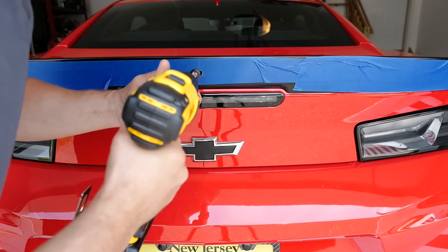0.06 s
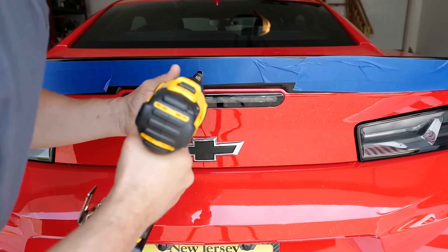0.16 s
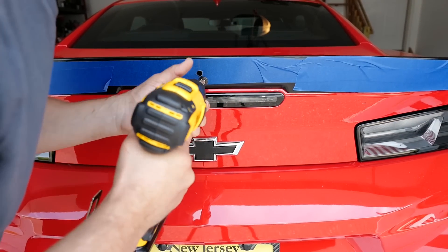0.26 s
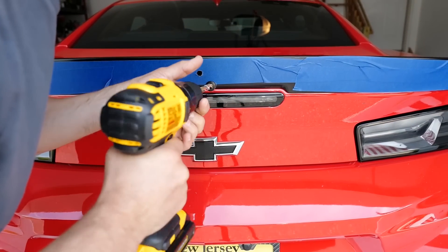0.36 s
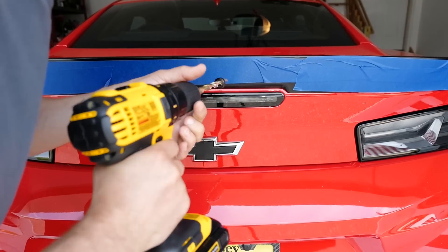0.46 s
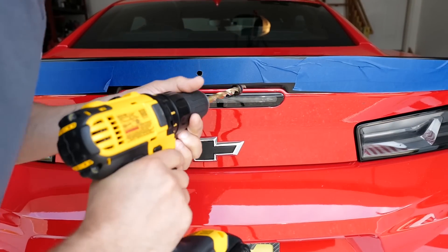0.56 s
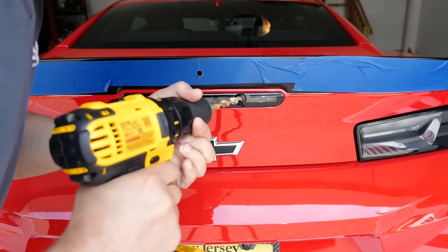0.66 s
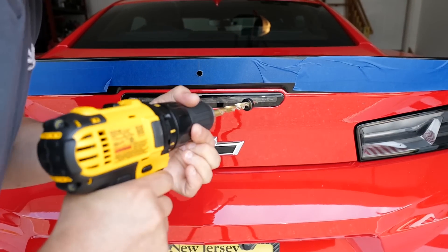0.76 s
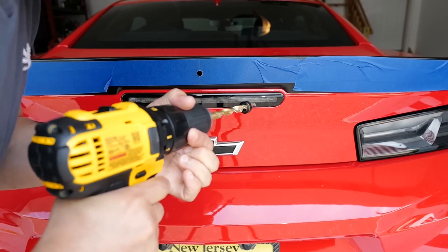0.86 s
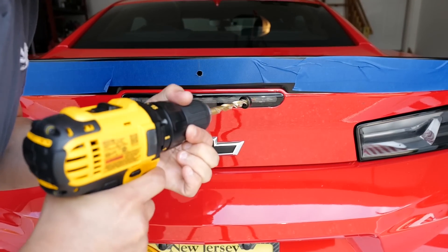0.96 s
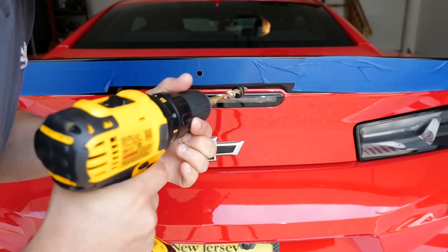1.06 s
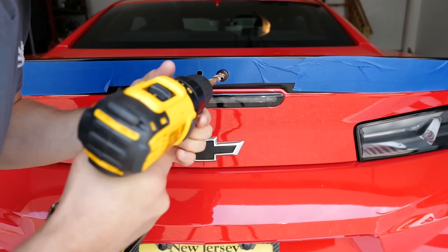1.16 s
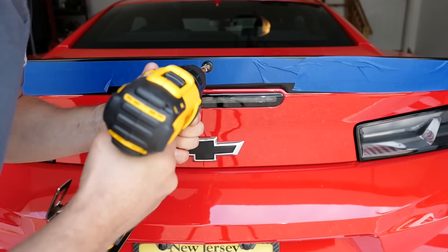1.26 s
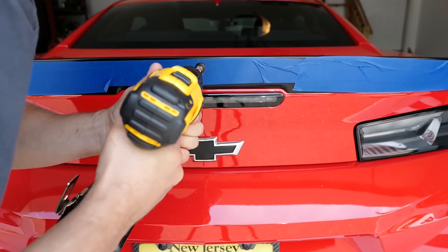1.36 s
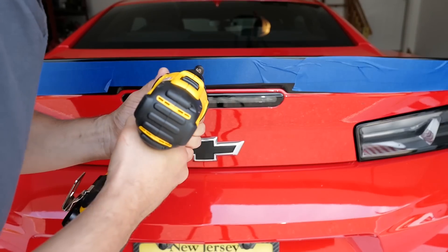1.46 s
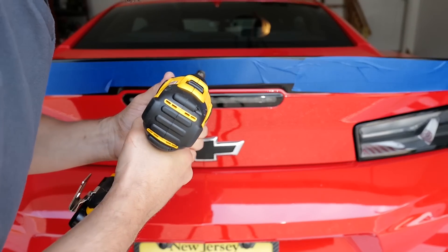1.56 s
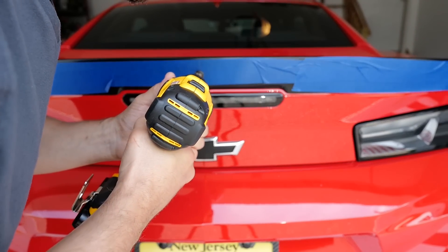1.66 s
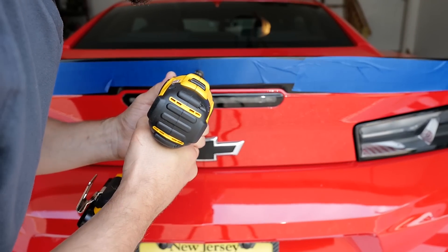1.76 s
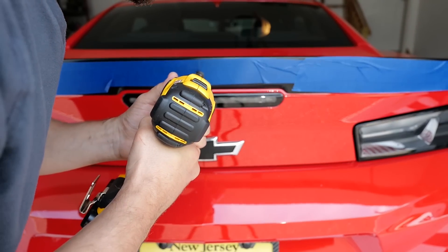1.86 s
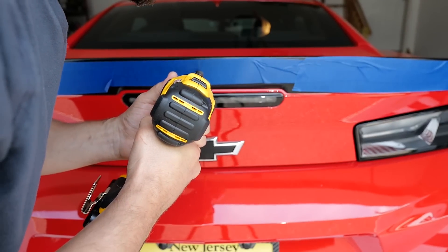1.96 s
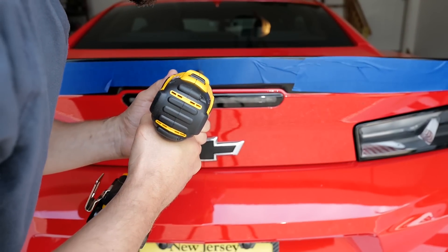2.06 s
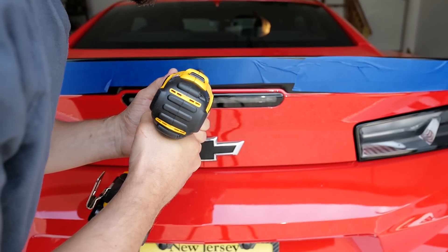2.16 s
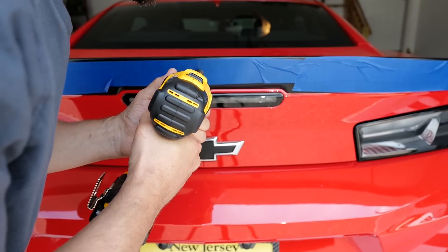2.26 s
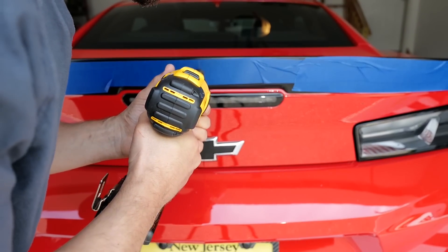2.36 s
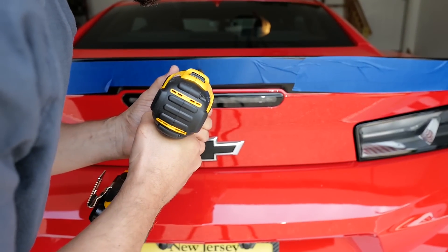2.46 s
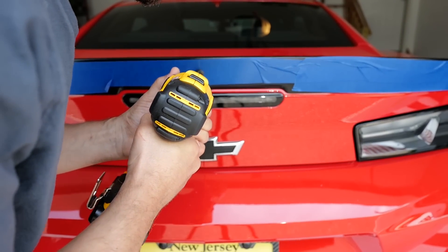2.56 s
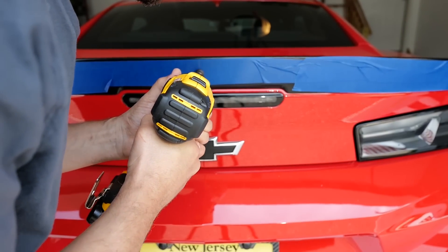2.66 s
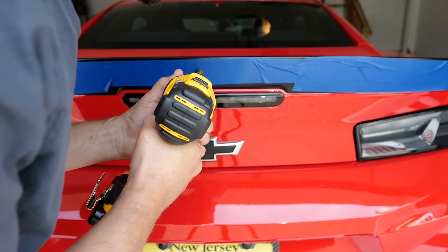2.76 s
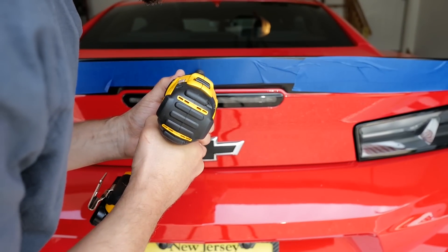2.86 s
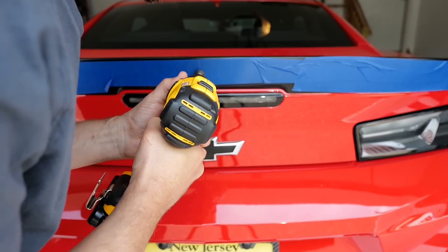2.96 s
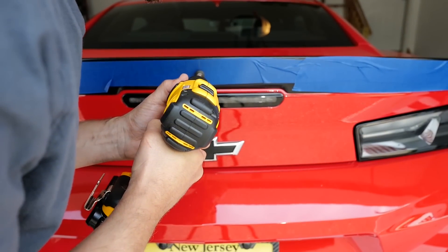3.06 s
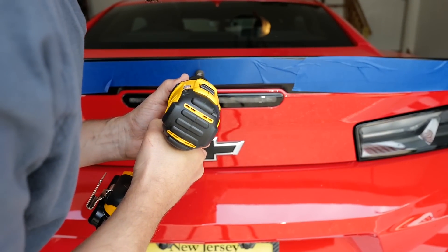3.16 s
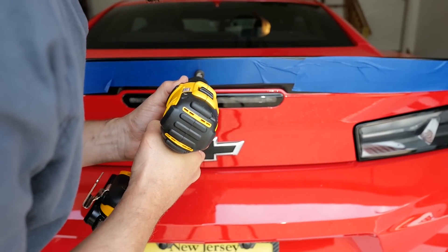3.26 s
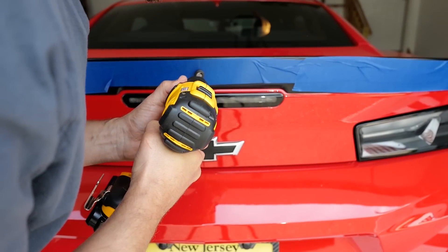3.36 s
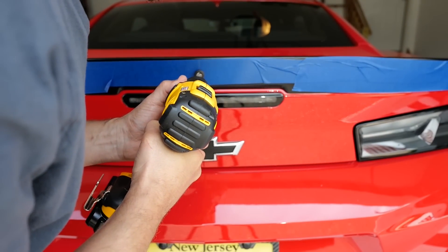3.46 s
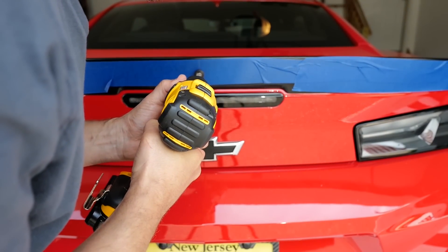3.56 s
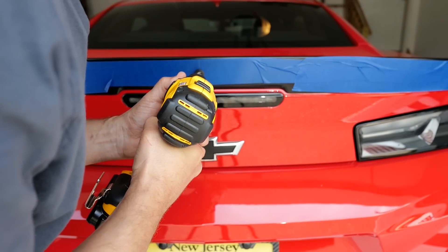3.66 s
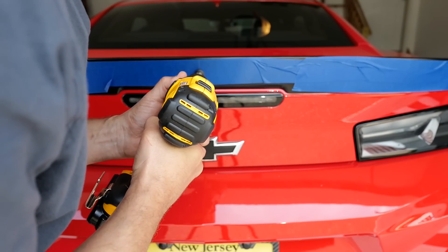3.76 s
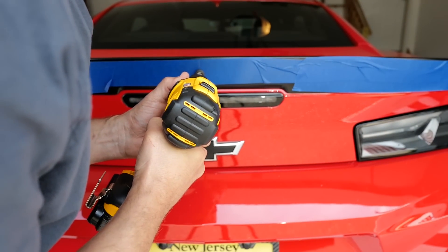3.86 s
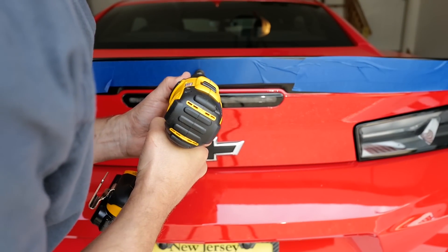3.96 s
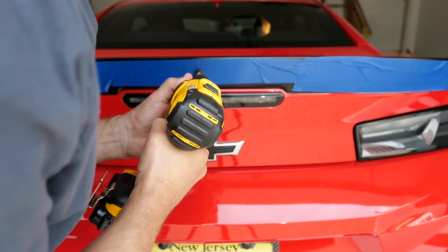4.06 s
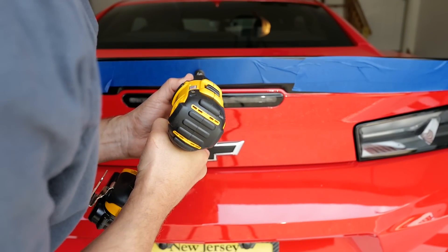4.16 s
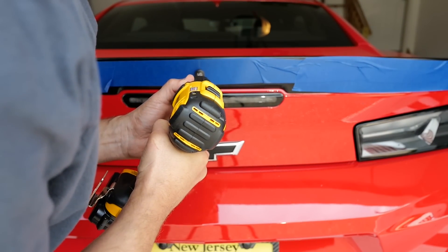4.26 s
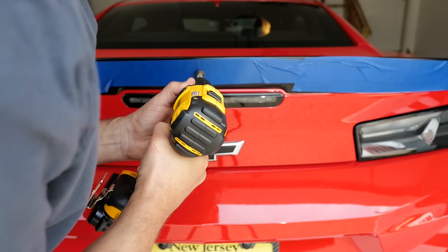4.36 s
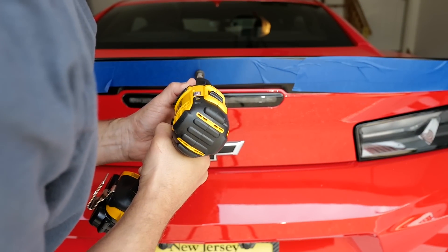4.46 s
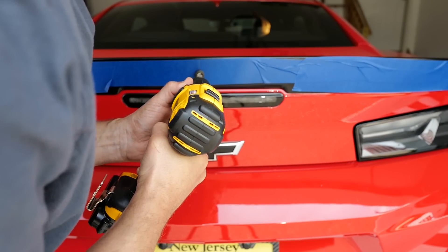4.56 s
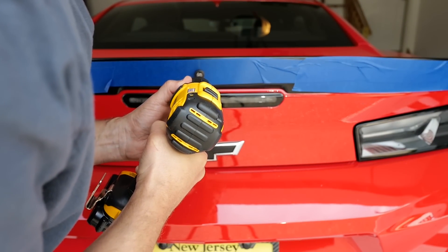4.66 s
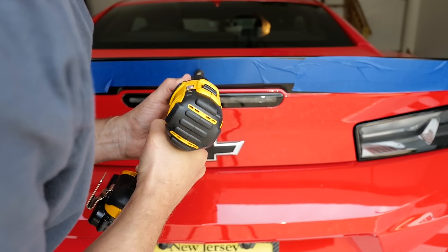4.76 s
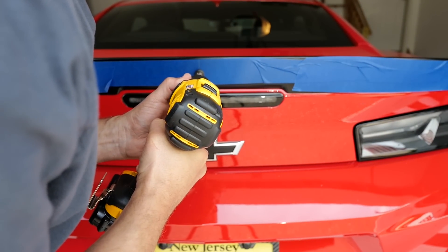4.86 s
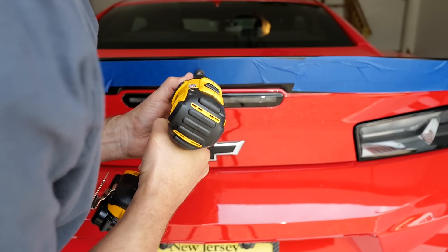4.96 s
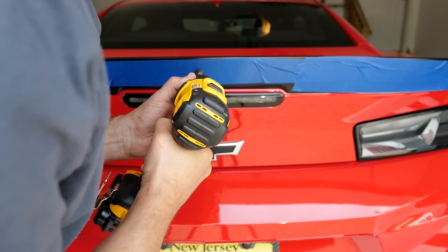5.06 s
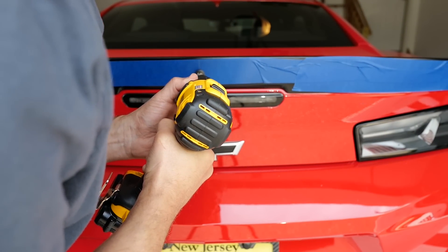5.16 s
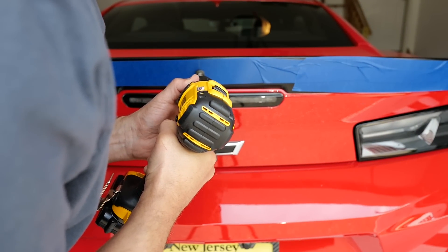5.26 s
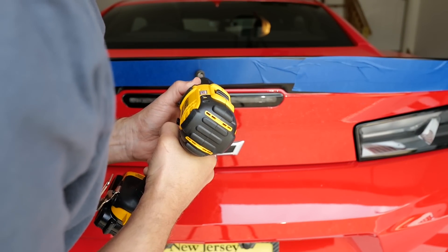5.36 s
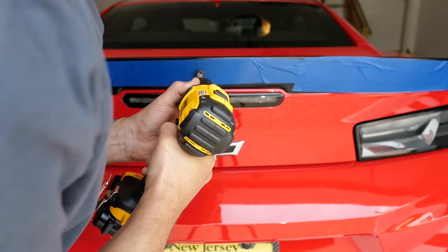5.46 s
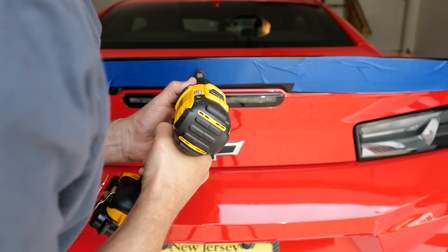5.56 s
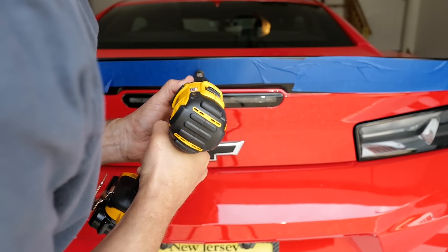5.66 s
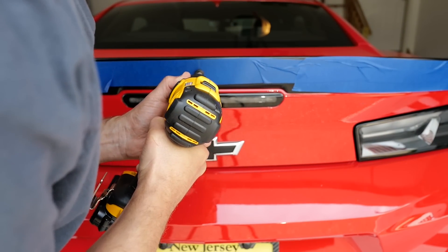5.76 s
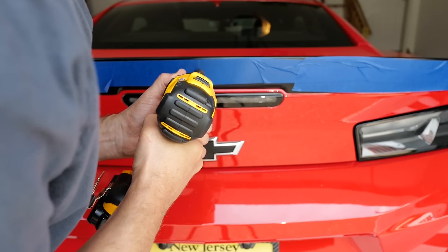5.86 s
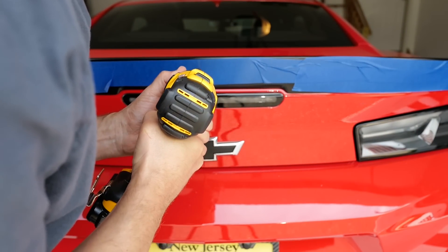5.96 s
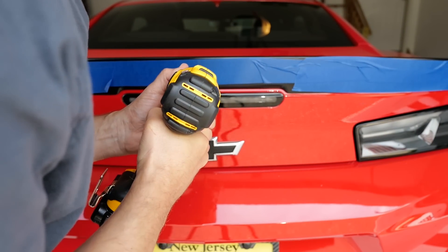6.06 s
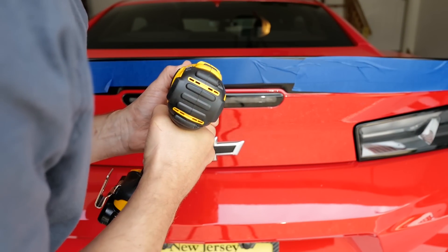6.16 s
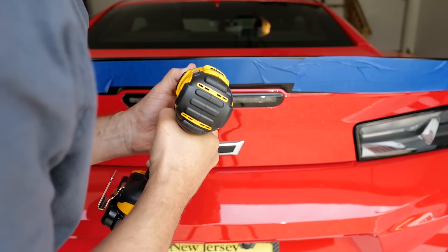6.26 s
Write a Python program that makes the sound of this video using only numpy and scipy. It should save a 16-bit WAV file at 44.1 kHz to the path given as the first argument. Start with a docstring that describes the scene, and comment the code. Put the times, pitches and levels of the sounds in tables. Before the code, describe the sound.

A quiet garage with low rumble and faint hum, picked up close in stereo with a short room tail. A faint high cricket chirps around 0.15-0.3 s. From 0 to 1.4 s hands adjust a drill chuck: light ticks, skin and cloth rubs, a sharp metallic clack at 0.77, a cluster of clicks near 0.95 and rough scraping around 1.0-1.2. Things grow calmer until about 2.0, when the bit taps and scrapes the car's sheet metal with duller knocks. At 2.3 the trigger clicks, a brief thin whistle sings, and the motor races up within about 0.3 s to a loud bright whine with gear rattle and airy fan hiss. Pitch sags gradually from 3.5, recovers quickly at 4.1, sinks deeper from 4.55, then surges back around 5.2-5.4, with rough bit chatter. It holds near full speed, still running at the end near 6.4.

```python
"""First come the clicks and scrapes of hands tightening a drill chuck, in a humming garage where a cricket chirps.
The bit then knocks and scrapes on a car's sheet metal: short rough pushes and grit ring steel or panel.
A click, a whistle from the speed control, and the motor runs up: fan, rotor and gears whine on multiples of the
shaft speed, over gear rattle and air hiss. The pitch sags twice, first as the trigger is eased, then as the bit
bites. The motor still runs at the end; a short room tail surrounds drill and hands."""
import sys
import numpy as np
from scipy import signal
from scipy.fft import rfft, irfft
from scipy.io import wavfile
from scipy.ndimage import uniform_filter1d

SR = 44100
rng = np.random.default_rng(int(sys.argv[2]) if len(sys.argv) > 2 else 0)


def generate_wav(sig):
    """Save sig (samples, or channels by samples) to the path in sys.argv[1] as 16-bit PCM at SR."""
    pcm = np.round(np.clip(np.atleast_2d(sig).T, -1, 1) * 32767).astype(np.int16)
    wavfile.write(sys.argv[1], SR, pcm)


N = 278271
T = np.arange(N) / SR  # time, s

# Colour of the garage rumble: f/Hz, relative level/dB per Hz
GARAGE_COLOUR = [(13, -64), (22, -34), (43, -31), (108, -8.5), (138, -8), (198, -6.5), (306, -8.5),
                 (502, -14.5), (758, -14.5), (2090, -25.5), (2400, -27.5), (3330, -29), (3820, -31),
                 (4150, -32), (15500, -37)]
# Steady garage hums: f/Hz, width/Hz, level/dB
GARAGE_HUMS = [(112, 24, -70), (168, 14, -65), (199.4, 10.7, -61.5), (227, 12.6, -63)]
RUMBLE_DB = -59

# Cricket pulses: start t/s, level/dB
CRICKET_CHIRPS = [(.13, -61), (.18, -63), (.215, -67), (.25, -68)]
CRICKET_HZ, CHIRP_S = 3910, 0.024

# Ringing of the chuck: f/Hz, relative level/dB, time to fall 60 dB/s
CHUCK_MODES = [(936, 0.5, 0.032), (1404, 7.5, 0.0086), (1860, 2, 0.015), (2230, 12, 0.0034),
               (3050, -15, .015)]
# Ringing of the steel jaws: f/Hz, relative level/dB, time to fall 60 dB/s
JAW_MODES = [(3520, -4, 0.0038), (4050, 0, 0.0042), (4600, -5, 0.006), (5650, -11, 0.013),
             (7160, -8, 0.002)]
# Ringing of the car panel: f/Hz, relative level/dB, time to fall 60 dB/s
PANEL_MODES = [(733, -0.5, 0.083), (996, 11, 0.016), (1400, -3, 0.012), (1920, 4, 0.018), (2550, -17, .012)]
# Rubs of hand and tool: loudest t/s, swell/s, fade/s, scrape level/dB, steel jaws level/dB,
# skin and cloth hiss level/dB
HAND_RUBS = [(0.0, .02, 0.37, -81, -60.5, -81), (.39, .15, .12, -73, -76, -66),
             (.61, 0.11, 0.076, -59, -64, -51.5), (.77, 0.025, 0.05, -55, -46.5, -54),
             (1.02, .13, .12, -42, -49, -64), (1.08, .1, 0.021, -47, -49.5, -71),
             (1.155, 0.04, 0.061, -50.5, -58, -50.5), (1.3, .3, 0.56, -55, -65, -69),
             (2.03, .05, 0.39, -58, -84, -73), (2.141, 0.038, 0.047, -45, -75, -64),
             (2.22, 0.23, .08, -54.5, -80, -69)]
# Hands merely holding the tool: scrape level/dB, steel level/dB, hiss level/dB
HOLDING_DB = (-77, -100, -79.5)
RUB_SPAN_DB = 20  # level change over one swell or fade time
TIP_ON_PANEL_S = 1.97  # from here the scrape rings the panel
# Single contacts: t/s, body peak level/dB, treble crack peak level/dB, contact/ms, share on the panel (0-1)
CONTACTS = [(0.036, -39.5, -41, 0.57, 0.4), (0.146, -50, -70, 4.2, 0.9), (.537, -44, -49, 2.3, 0),
            (.634, -50, -66, 5, 0.9), (.675, -44, -57, 2.5, 0.1), (.712, -52, -43, 1.2, 0),
            (.722, -36, -37, 5, 0), (0.7693, -20, -31, 0.68, 0.23), (.92, -51, -40, .5, 0.1),
            (.952, -31, -42, .6, 0), (.966, -36, -37, 0.26, 0), (.978, -48, -39, .4, 0),
            (.997, -41, -43, .6, 0), (1.123, -41, -36, 0.65, 0.2), (1.141, -31.5, -28.5, 6.8, 0),
            (1.202, -49, -38, 2.8, 0.1), (1.39, -38, -49, 2.1, 0.14), (2.003, -35.5, -64, .8, 1),
            (2.124, -45, -60, 2.3, 0.7), (2.226, -44, -66, 1.1, 1), (2.298, -50, -39, 2, 0)]

# Speed control whistle: t/s, level/dB
WHISTLE_LEVEL = [(2.298, -43), (2.33, -38), (2.36, -39.5), (2.39, -32), (2.43, -34)]
WHISTLE_HZ = 3932  # switching rate
WHISTLE_MULTIPLE_DB = [-4, 2, -10, -10]  # relative starting levels of multiples 1 to 4
WHISTLE_DULL_DB_PER_S = 120  # each higher multiple fades this much faster
WHISTLE_WAVER_DB = 1.5

# Shaft speed glides as trigger or load changes: start t/s, speed it heads for f/Hz, time constant/s
SHAFT_GLIDES = [(2.306, 410.3, 0.073), (3.284, 407.4, 0.003), (3.467, 302.7, 0.224), (4.125, 405.7, 0.074),
                (4.546, 267.4, 0.289), (5.181, 288.4, 0.071), (5.261, 405.8, 0.086), (6.175, 403.7, 0.138)]
MAX_CLIMB_HZ_PER_S = 1800
FULL_HZ = 415  # shaft speed at which full-speed levels hold
GEAR_RATIO, BITE_S = 17.4, 5.065  # shaft turns per chuck turn; a moment when the cutting lip bites

# Main tones, in shaft multiples: unbalance, its octave, rotor slots, fan blades, blade octave
MAIN_MULTIPLES = (1, 2, 10, 19, 38)
FAN_MULTIPLE = MAIN_MULTIPLES[3]
# One row for each main tone: full-speed level before the housing/dB, tilt/dB per octave of speed,
# rise under strain/dB, waver/dB
MAIN_TONES = [(-42.5, -1.5, -4, 1.5), (-44, 4.5, 3, 1.5), (-30.5, 2.5, 3, 1.8), (-27, 7.5, 6.5, 1.25),
              (-41.5, 0, 1, 4.5)]
# What the housing lets out of a main tone: f/Hz, gain/dB
HOUSING_GAIN = [(150, -21), (250, -28), (285, -1.5), (320, -4.5), (350, -5.5), (390, 1.5), (420, -0.3),
                (515, -11), (570, -3), (700, -2), (760, -0.5), (830, -14.5), (1500, -8), (2000, 5),
                (2600, 10.5), (2760, -12), (3300, -18), (3430, -5), (3800, 3), (4100, -1), (4900, -2),
                (5400, 5), (6000, -2), (6250, -4), (6550, -2.5), (6850, -9), (7200, 3.5), (7800, 3.5),
                (8300, 0.1), (10800, -11), (11500, 0.1), (12200, -3), (12800, 0), (13600, 0), (14400, 2),
                (15200, 5.5), (15800, -4)]
# Tones that stand out near one pitch: chatter of the bit, octave of the rotor slots (shaft multiples)
PEAK_MULTIPLES = (7, 20)
# One row for each: best level/dB, best pitch f/Hz, loss/dB per octave off it, least level/dB,
# swing per chuck turn/dB, waver/dB
PEAK_TONES = [(-38.5, 1990, 70, -45, 3.4, 1.2), (-32.5, 6840, 70, -42, -1, 4)]
# Weaker tones, buried when the motor slows: shaft multiple, full-speed level/dB
WEAK_TONES = [(3.023, -46.5), (4, -46), (8.91, -46), (11.91, -44.5), (13.9, -47.5), (12.98, -47.5),
              (15.93, -43.5), (17.05, -44.5), (18.4, -49), (4.96, -53.5), (20.7, -53), (22.6, -45),
              (29.6, -42.5)]
WEAK_DB_PER_OCTAVE = 6
TONE_KNEE_HZ, TONE_DB_PER_OCTAVE = 204, 20  # all tones die away below this shaft speed

# Colour of the gear rattle: f/Hz, relative level/dB per Hz
RATTLE_COLOUR = [(30, -90), (150, -61), (250, -18), (318, -12.5), (529, -15.5), (615, -20), (747, -15),
                 (1260, -6), (2070, -3.5), (4130, -4.5), (5570, -4), (6870, -9), (9000, -7), (11700, -75),
                 (19800, -120)]
RATTLE_DB, RATTLE_SURGE_DB = -27.5, 3.5  # basic level; extra under full strain
RATTLE_KNEE_HZ, RATTLE_DB_PER_OCTAVE = 262, 7.5  # fades below this shaft speed
# Colour of the fan's air hiss: f/Hz, relative level/dB per Hz
AIR_COLOUR = [(1500, -30.5), (3000, -11), (4500, -14), (6700, -12.5), (7700, 0.5), (9000, 1.5),
              (11000, -1.5), (13000, -0.5), (16000, -6)]
AIR_DB_PER_OCTAVE, AIR_SURGE_DB = 12, 6.5
STRAIN_LAG_S = 0.034
BLADE_HISS_DB, BLADE_HISS_HZ = -38, 500  # full-speed level; reach either side of the fan tone
# Slow drifts: t/s, air hiss full-speed level/dB, bit chatter level/dB, fan tone change/dB
SLOW_DRIFT = [(2.36, -29, -52, 0), (2.45, -23.5, -45, -1.5), (2.57, -25, -42, 1), (2.75, -24.5, -41, -0.5),
              (3.47, -25.5, -48, 1.5), (3.9, -24, -42.5, -4), (4.36, -25, -37.5, 0), (4.6, -26, -46, -1.5),
              (4.9, -24.5, -55, -0.5), (5.07, -25.5, -39, 1.5), (5.43, -24.5, -36, -1.5),
              (5.65, -25.5, -39, -2), (5.9, -24, -38, -5), (6.1, -24, -43, -6), (6.25, -24, -42, 0.5)]

# Room sound from the sides: f/Hz, level under the centre/dB
ROOM_SIDE_COLOUR = [(100, -19), (300, -22), (520, -9), (1200, -18), (2400, -19), (4400, -16), (8000, -17),
                    (13000, -14)]
# Left-right balance of drill and hands: f/Hz, left minus right/dB
LEFT_MINUS_RIGHT = [(100, 3.5), (500, -1), (1200, 1), (2400, 0), (4400, 1), (8000, 2.5), (14000, -1.5)]
QUIET_LIFT_DB, LOUD_DB = 2.5, -17  # largest lift; level at which no lift is left
TOP_HZ = 15720


def undb(db):
    """Turn decibels into a plain multiplier."""
    return 10 ** (np.asarray(db) / 20)


def unit(x):
    """Scale to an average (RMS) level of one."""
    return x / np.sqrt(np.mean(x ** 2))


def noise():
    """White noise: every pitch equally strong."""
    return rng.standard_normal(N)


def colour(x, table, share=1):
    """Filter by (Hz, dB) points joined on a log-frequency axis; share scales the dB."""
    hz, db = np.transpose(table)
    f = np.arange(N // 2 + 1) * SR / N + 1  # 1 Hz added to avoid log of zero
    gain = undb(share * np.interp(np.log(f), np.log(hz), db))
    return irfft(rfft(x) * gain, N)


def band(x, lo_hz, hi_hz):
    """Keep mainly the sound between two frequencies."""
    return signal.sosfilt(signal.butter(2, [lo_hz, hi_hz], "bandpass", fs=SR, output="sos"), x)


def ring(x, modes):
    """Add up the decaying tones of a solid body driven by x."""
    out = 0
    for hz, db, t60 in modes:
        decay = np.exp(-np.log(1000) / (t60 * SR))
        angle = 2 * np.pi * hz / SR
        feedback = [1, -2 * decay * np.cos(angle), decay * decay]
        out = out + undb(db) * signal.lfilter([0, np.sin(angle)], feedback, x)
    return out


def walk(rate):
    """Smooth random wander: levels held for 1 / rate seconds, averaged twice."""
    hold = int(SR / rate)
    steps = np.repeat(rng.standard_normal(N // hold + 1), hold)
    smooth = uniform_filter1d(uniform_filter1d(steps, hold), hold)
    return unit(smooth[:N])


def grit(rate, scatter_db):
    """Tiny impacts of uneven size at random moments, about rate per second."""
    hits = rng.random(N) < rate / SR
    size = undb(scatter_db * np.minimum(rng.exponential(size=N), 4))
    return unit(hits * noise() * size)


def curves(table):
    """Join each column's points over time."""
    s, *columns = np.transpose(table)
    return [np.interp(T, s, c) for c in columns]


def garage():
    """Broad rumble with a few wavering hums, nearly the same at both microphone ports."""
    def field():
        """One layer of coloured noise plus narrow bands of noise."""
        hums = sum(undb(db) * unit(band(noise(), f - width / 2, f + width / 2))
                   for f, width, db in GARAGE_HUMS)
        return undb(RUMBLE_DB) * unit(colour(noise(), GARAGE_COLOUR)) + hums
    difference = undb(-12.5) * np.array([[1], [-1]]) * field()
    return field() + difference


def cricket():
    """Short smooth pulses of one pitch."""
    half = CHIRP_S / 2
    gate = sum(undb(db) * np.exp(-((T - s - half) / half) ** 4) for s, db in CRICKET_CHIRPS)
    return gate * np.sin(2 * np.pi * CRICKET_HZ * T)


def hands():
    """Stick-slip grit rings chuck, jaws or panel; palms and sleeves hiss."""
    power = undb(HOLDING_DB)[:, None] ** 2
    for s, swell, fade, *db in HAND_RUBS:
        # distance from the loudest moment, in swell or fade times
        away = np.where(T < s, (s - T) / max(swell, 0.005), (T - s) / max(fade, 0.005))
        shape = undb(-RUB_SPAN_DB * np.minimum(away, 5))
        power = power + undb(db)[:, None] ** 2 * shape ** 2
    scrape, steel, skin = np.sqrt(power)
    slips = 0.84 * grit(600, 1.2) + noise()
    on_panel = np.clip((T - TIP_ON_PANEL_S) / 0.025, 0, 1)
    body = (1 - on_panel) * unit(ring(slips, CHUCK_MODES)) + on_panel * unit(ring(slips, PANEL_MODES))
    jaws = unit(ring(slips, JAW_MODES))
    hiss = unit(band(noise(), 5800, 18000))
    before_motor = T < SHAFT_GLIDES[0][0]
    return before_motor * (scrape * body + steel * jaws + skin * hiss)


def knocks():
    """Each contact is a short rough push that rings the metal, with a crack of treble."""
    out = np.zeros(N)
    t = np.arange(int(0.12 * SR)) / SR
    for s, db, crack_db, ms, panel in CONTACTS:
        push = rng.standard_normal(len(t)) * np.sqrt(t) * np.exp(-(1000 * t / max(ms, 0.2)) ** 2)
        panel = np.clip(panel, 0, 1)
        thud = 0.71 * band(push, 360, 1300)  # painted sheet takes a blow softly
        body = (1 - panel) * ring(push, CHUCK_MODES) + panel * ring(thud, PANEL_MODES)
        crack = band(push, 2400, 11000) + 0.14 * ring(push, JAW_MODES)
        start = int(s * SR)
        knock = undb(db) * body / np.abs(body).max()
        knock += undb(crack_db) * crack / np.abs(crack).max()
        out[start:start + len(t)] += knock
    return out


def whistle():
    """The chopped current sings in the windings until the trigger is fully in."""
    start, end = WHISTLE_LEVEL[0][0], WHISTLE_LEVEL[-1][0]
    gate = (T > start) & (T < end)
    elapsed = np.clip(T - start, 0, 1)
    tones = 0
    for k, db in enumerate(WHISTLE_MULTIPLE_DB):
        level_db = db - k * WHISTLE_DULL_DB_PER_S * elapsed + WHISTLE_WAVER_DB * walk(60)
        tones = tones + undb(level_db) * np.sin(2 * np.pi * (k + 1) * WHISTLE_HZ * T)
    return gate * undb(curves(WHISTLE_LEVEL)[0]) * tones


def speed():
    """The shaft glides toward each new speed, climbing no faster than the motor can."""
    hz, now = np.zeros(N), 0
    ends = [row[0] for row in SHAFT_GLIDES[1:]] + [N / SR]
    for (s, goal, tau), end in zip(SHAFT_GLIDES, ends):
        elapsed = np.clip(T, s, end) - s
        # a straight climb first, then an easing toward the goal
        ramp = max(goal - now - MAX_CLIMB_HZ_PER_S * tau, 0) / MAX_CLIMB_HZ_PER_S
        glide = now + MAX_CLIMB_HZ_PER_S * np.minimum(elapsed, ramp)
        glide = goal + (glide - goal) * np.exp(-np.maximum(elapsed - ramp, 0) / tau)
        hz = np.where(T >= s, glide, hz)
        now = glide[-1]
    return np.maximum(hz, 1)


def drill():
    """Tones locked to the shaft, gear rattle and air hiss; bit chatter swells once a chuck turn."""
    hz = speed()
    air_db, chatter_db, fan_db = curves(SLOW_DRIFT)
    octaves = np.log2(hz / FULL_HZ)
    turn = 2 * np.pi * np.cumsum(hz) / SR  # shaft angle, radians
    bite = np.cos((turn - turn[int(BITE_S * SR)]) / GEAR_RATIO)
    climb = np.gradient(hz) * SR
    racing = np.clip(np.abs(climb) / 500, 0, 1)  # tones break up while the speed changes fast
    keep = np.exp(-1 / (STRAIN_LAG_S * SR))
    # strain follows a climb in speed with a short lag
    strain = signal.lfilter([1 - keep], [1, -keep], np.clip(climb / MAX_CLIMB_HZ_PER_S, 0, 1))
    slow_db = TONE_DB_PER_OCTAVE * np.minimum(np.log2(hz / TONE_KNEE_HZ), 0)
    case_hz, case_db = np.transpose(HOUSING_GAIN)

    def tone(k, db, waver_db):
        """A sine on shaft multiple k with wavering level and phase."""
        level_db = db + waver_db * walk(30) + 2.8 * racing * (walk(90) - 0.5)
        phase = k * turn + 0.26 * walk(60) + 7 * rng.random()
        return np.sqrt(2) * undb(level_db) * np.sin(phase)

    tones = 0
    for k, (db, tilt_db, rise_db, waver_db) in zip(MAIN_MULTIPLES, MAIN_TONES):
        level_db = db + tilt_db * octaves + rise_db * strain + slow_db
        level_db += np.interp(np.log(k * hz), np.log(case_hz), case_db)
        if k == FAN_MULTIPLE:
            level_db += fan_db
        tones = tones + tone(k, level_db, waver_db)
    for k, (db, best_hz, loss_db, least_db, swing_db, waver_db) in zip(PEAK_MULTIPLES, PEAK_TONES):
        peak_db = np.maximum(db - loss_db * np.abs(np.log2(k * hz / best_hz)), least_db)
        tones = tones + tone(k, peak_db + slow_db + swing_db * bite, waver_db)
    for k, db in WEAK_TONES:
        tones = tones + tone(k, db + WEAK_DB_PER_OCTAVE * octaves + slow_db, 2.5)

    # gear teeth: rough noise, slightly stronger once a shaft turn
    teeth = (noise() + 0.5 * grit(4000, 2.6)) * (1 + 0.1 * np.cos(turn))
    rattle_db = RATTLE_DB + RATTLE_DB_PER_OCTAVE * np.minimum(np.log2(hz / RATTLE_KNEE_HZ), 0)
    rattle_db += RATTLE_SURGE_DB * strain + 0.26 * walk(14) + 0.1 * bite
    rattle = undb(rattle_db) * unit(colour(teeth, RATTLE_COLOUR))

    gusts = (noise() + 0.28 * grit(5500, 1.2)) * (1 + 0.17 * np.cos(turn))
    air_change_db = AIR_DB_PER_OCTAVE * octaves + AIR_SURGE_DB * strain
    air_db = air_db + air_change_db + 0.75 * walk(20) + 0.25 * bite
    air = undb(air_db) * unit(colour(gusts, AIR_COLOUR))
    # ragged wakes of the blades spread hiss around the fan tone
    wakes = unit(band(noise(), 51, BLADE_HISS_HZ)) * np.sin(FAN_MULTIPLE * turn)
    air += undb(BLADE_HISS_DB + air_change_db) * wakes

    chatter = undb(chatter_db + 0.77 * bite) * unit(band(noise() + grit(900, 1.5), 1946, 2235))
    fade_in = np.clip((T - SHAFT_GLIDES[0][0]) / 0.033, 0, 1)
    return (tones + rattle + air + chatter) * fade_in


def room(x, t60_s=0.24, wet_db=-17):
    """Car, floor and walls send back a short diffuse tail; its side part wavers at random."""
    t = np.arange(int(0.3 * SR)) / SR
    tails = rng.standard_normal((2, len(t))) * np.exp(-np.log(1000) * t / t60_s) * (t > 0.002)
    tails = tails / np.sqrt((tails ** 2).sum(axis=1, keepdims=True))
    centre, side = signal.fftconvolve(x[None], tails, axes=1)[:, :N]
    side = colour(side * walk(14), ROOM_SIDE_COLOUR)
    return x + undb(wet_db) * centre + np.array([side, -side])


def scene():
    """Put drill and hands in the room, then add the garage and the cricket."""
    touches = band(hands() + knocks(), 770, 11800)  # small parts radiate no bass
    left, right = room(drill() + whistle() + touches)
    near = np.array([colour(left, LEFT_MINUS_RIGHT, 0.5), colour(right, LEFT_MINUS_RIGHT, -0.5)])
    return near + garage() + cricket()


def record(dry):
    """Gain control lifts quiet moments; the camera body cancels a band near 500 Hz; both extremes are cut."""
    power = signal.lfilter([0.0002], [1, 0.0002 - 1], dry.mean(axis=0) ** 2)  # running average
    loud = np.sqrt(power)
    heard = dry * undb(QUIET_LIFT_DB * (1 - np.clip(loud / undb(LOUD_DB), 0, 1)))
    heard = signal.lfilter(*signal.iirnotch(505, 2.5, fs=SR), heard)
    heard = signal.lfilter(*signal.butter(2, 30, "highpass", fs=SR), heard)
    return signal.sosfilt(signal.ellip(14, 0.3, 70, TOP_HZ, fs=SR, output="sos"), heard)


dry = scene()
out = record(dry)
generate_wav(out)
```